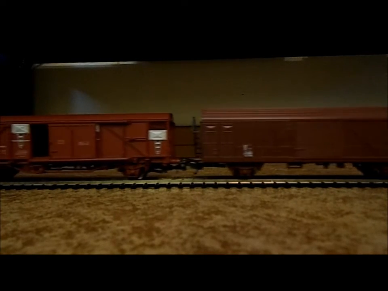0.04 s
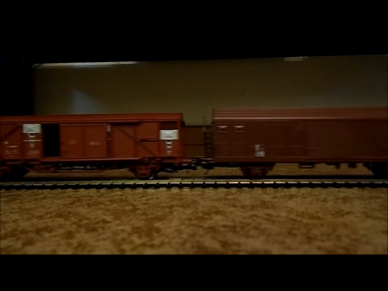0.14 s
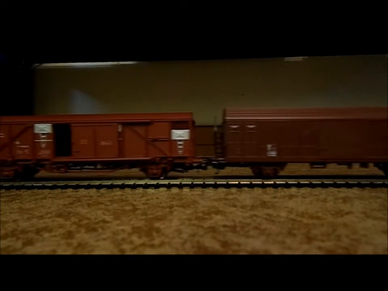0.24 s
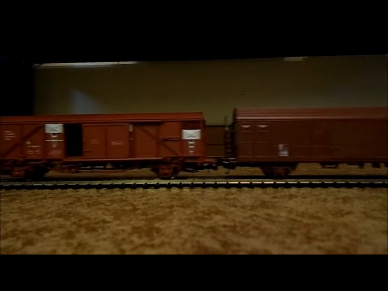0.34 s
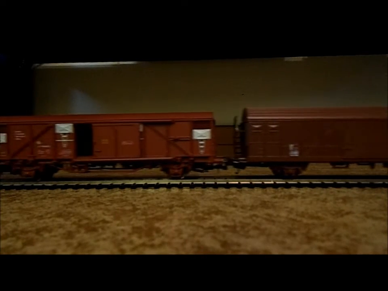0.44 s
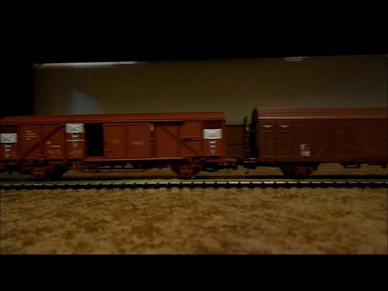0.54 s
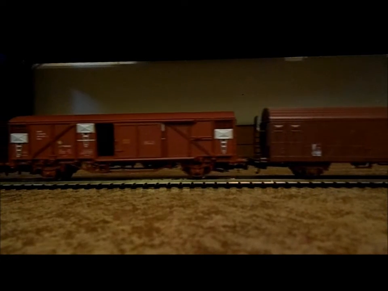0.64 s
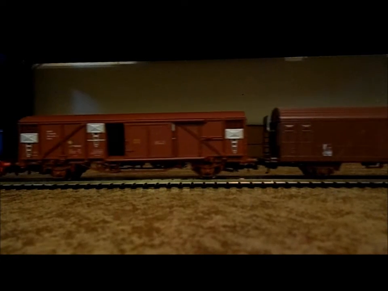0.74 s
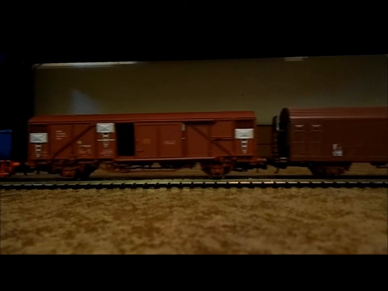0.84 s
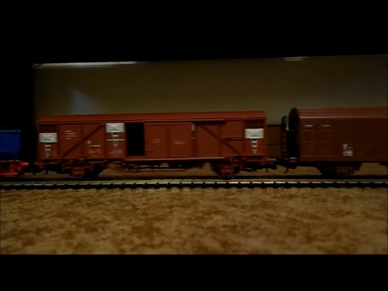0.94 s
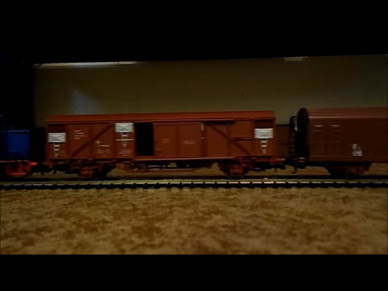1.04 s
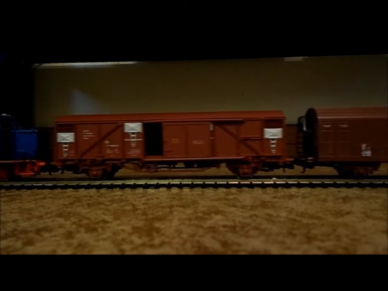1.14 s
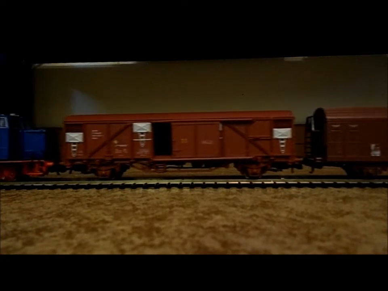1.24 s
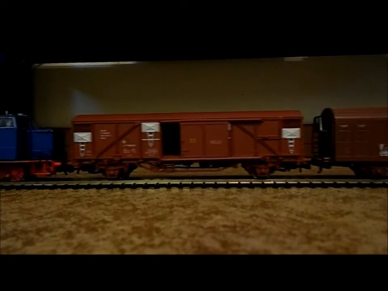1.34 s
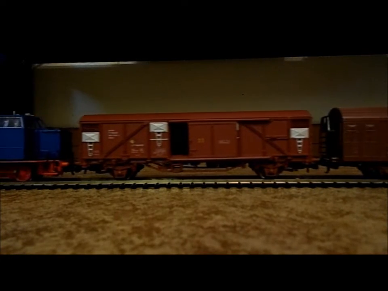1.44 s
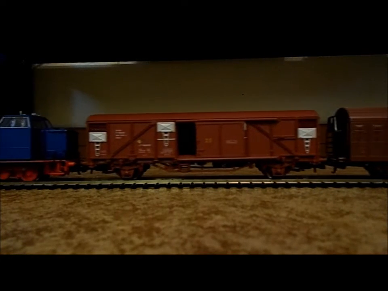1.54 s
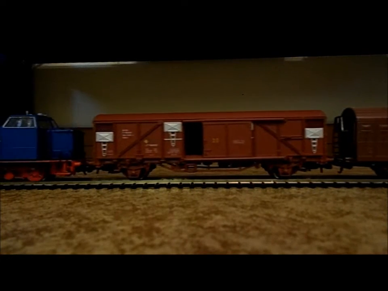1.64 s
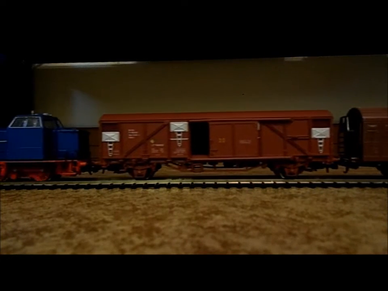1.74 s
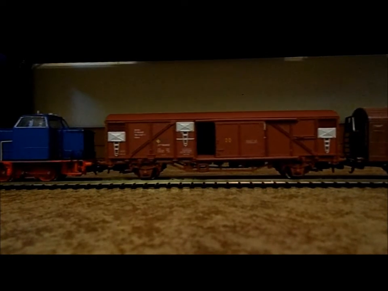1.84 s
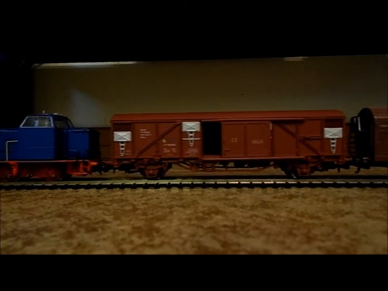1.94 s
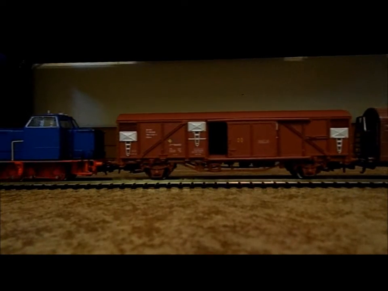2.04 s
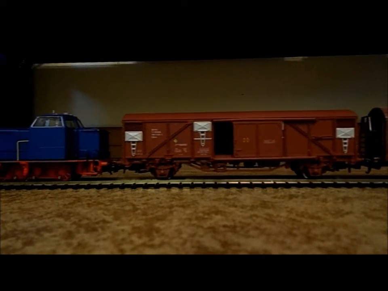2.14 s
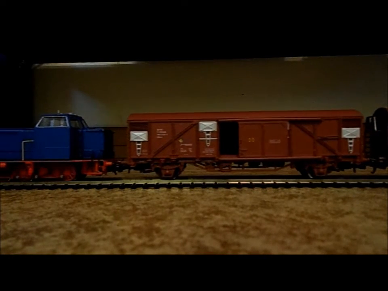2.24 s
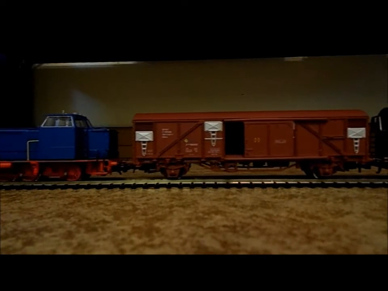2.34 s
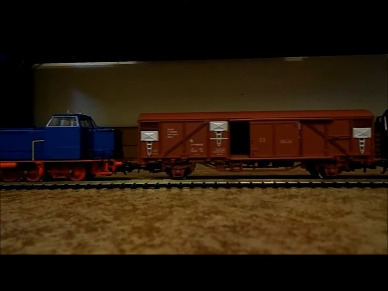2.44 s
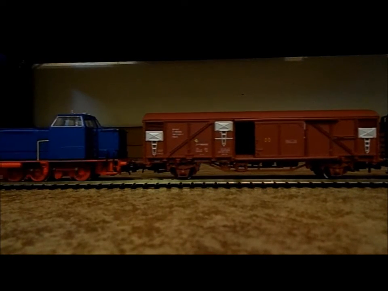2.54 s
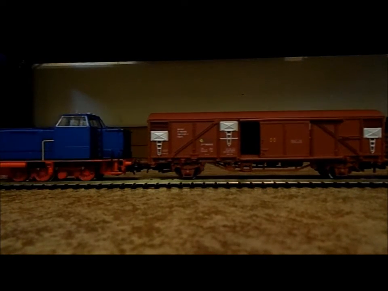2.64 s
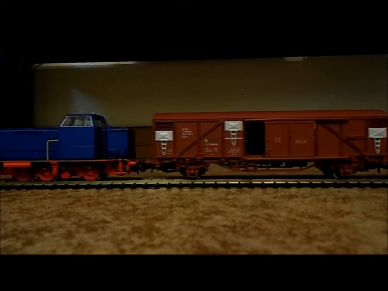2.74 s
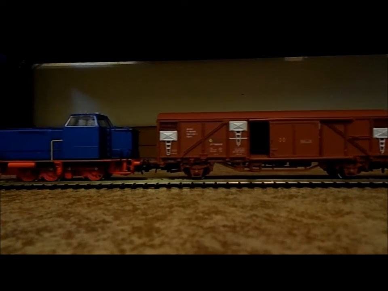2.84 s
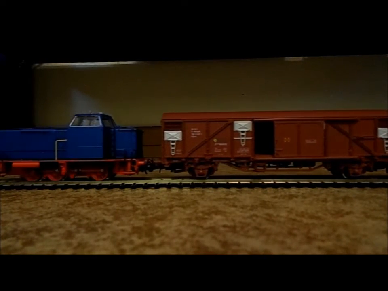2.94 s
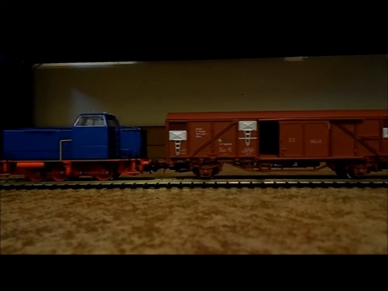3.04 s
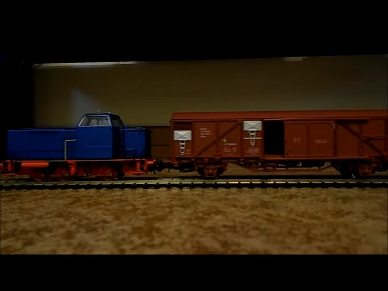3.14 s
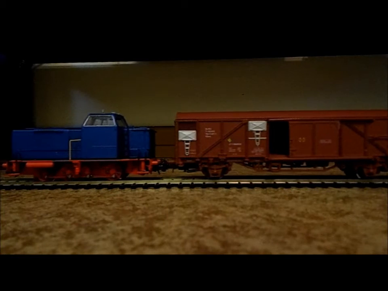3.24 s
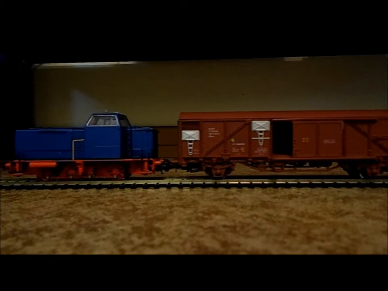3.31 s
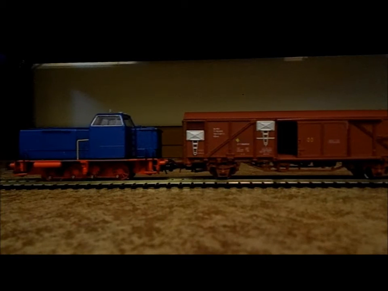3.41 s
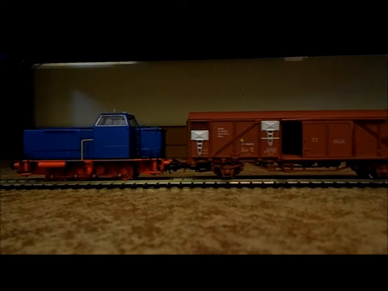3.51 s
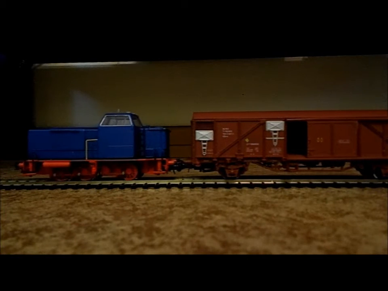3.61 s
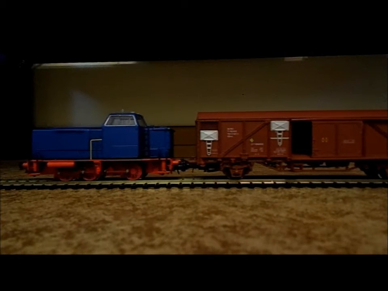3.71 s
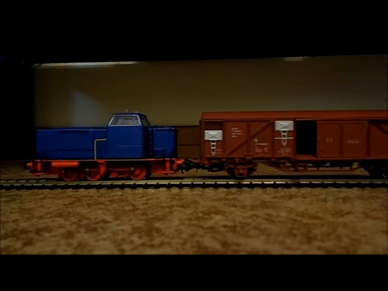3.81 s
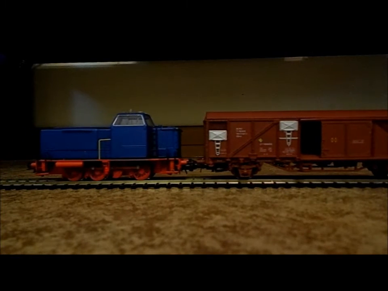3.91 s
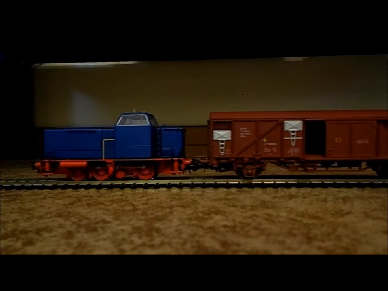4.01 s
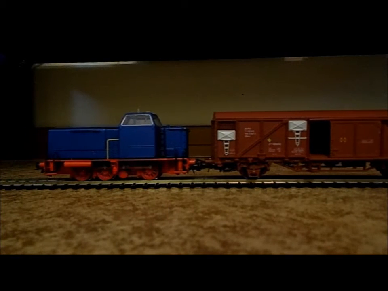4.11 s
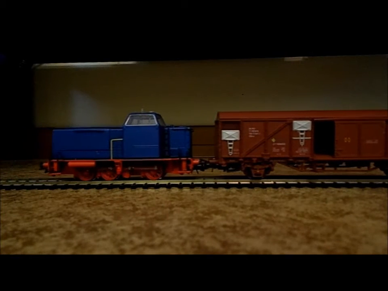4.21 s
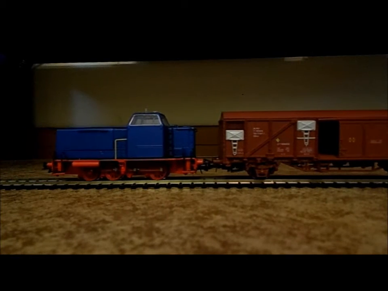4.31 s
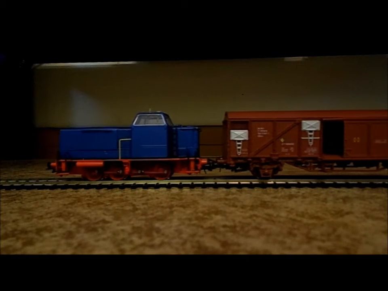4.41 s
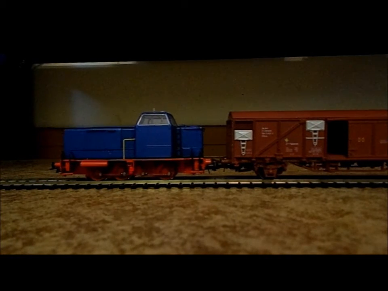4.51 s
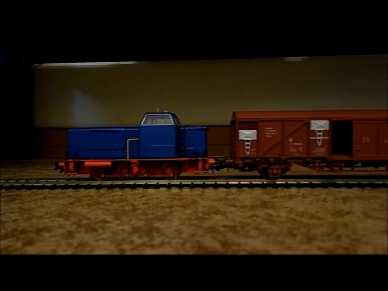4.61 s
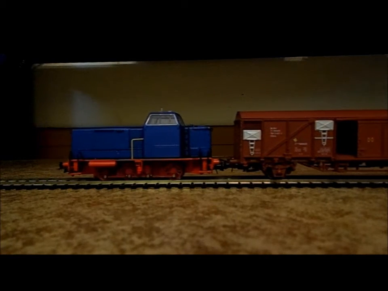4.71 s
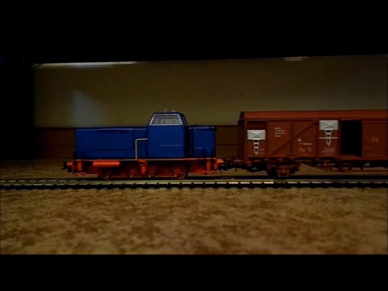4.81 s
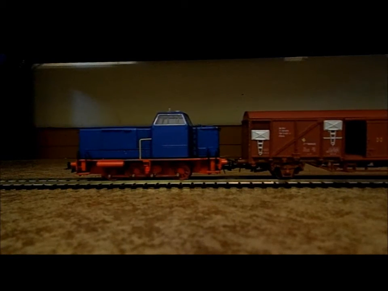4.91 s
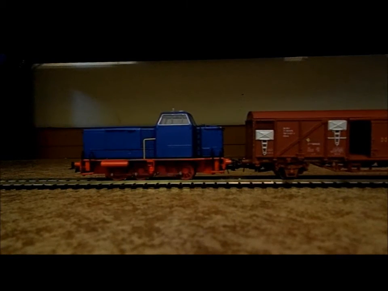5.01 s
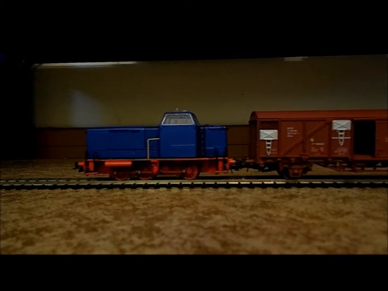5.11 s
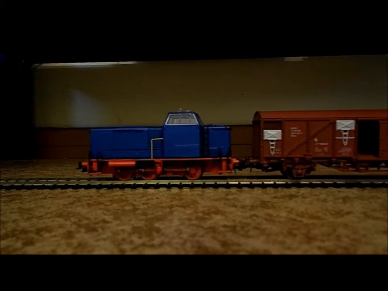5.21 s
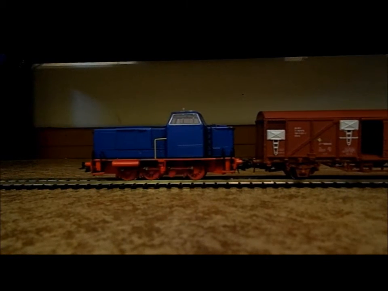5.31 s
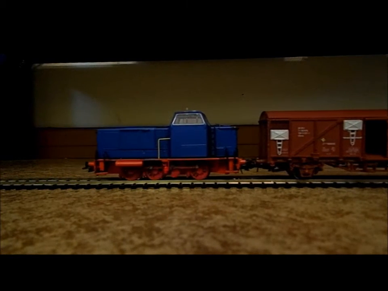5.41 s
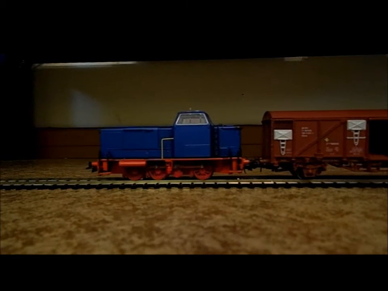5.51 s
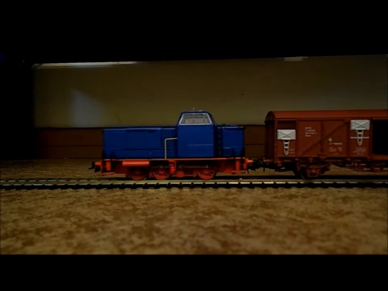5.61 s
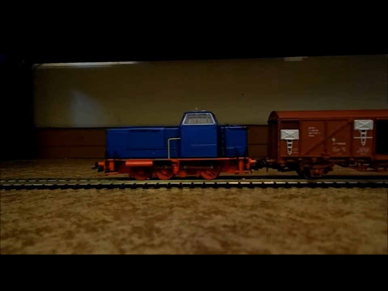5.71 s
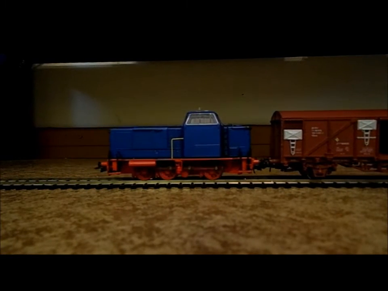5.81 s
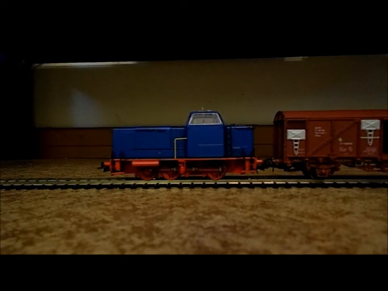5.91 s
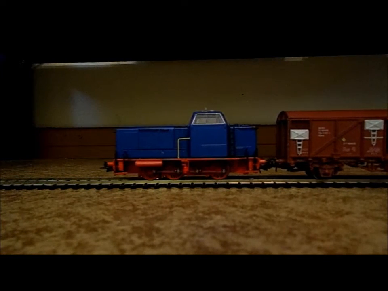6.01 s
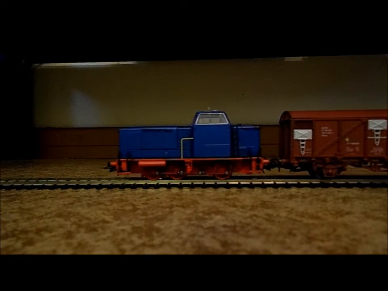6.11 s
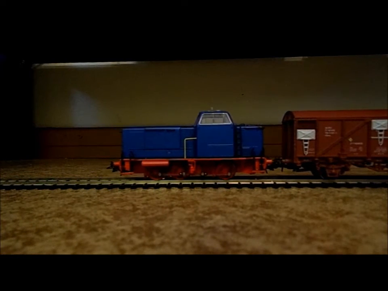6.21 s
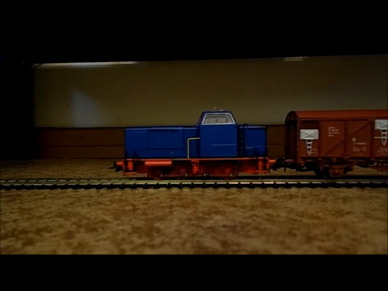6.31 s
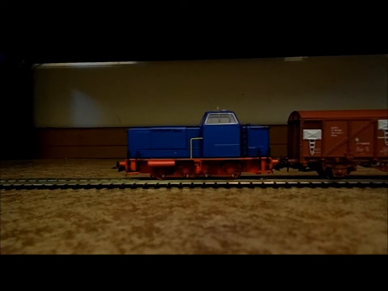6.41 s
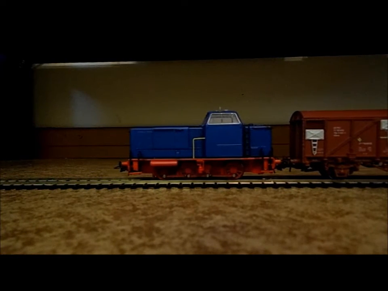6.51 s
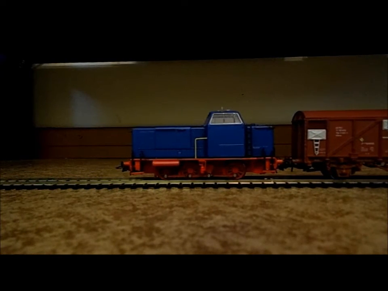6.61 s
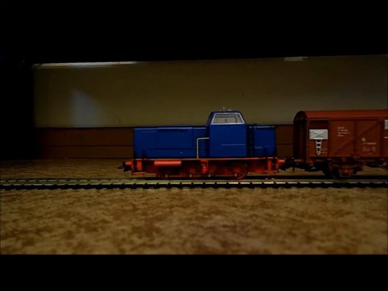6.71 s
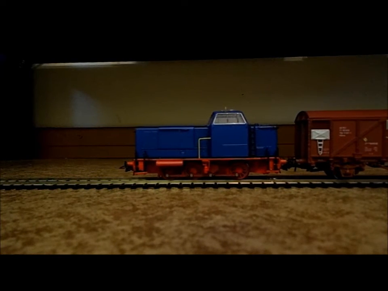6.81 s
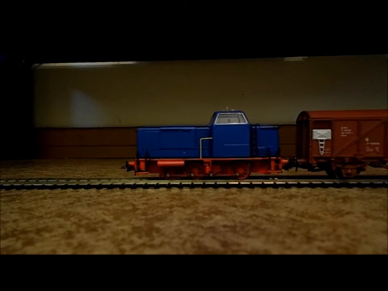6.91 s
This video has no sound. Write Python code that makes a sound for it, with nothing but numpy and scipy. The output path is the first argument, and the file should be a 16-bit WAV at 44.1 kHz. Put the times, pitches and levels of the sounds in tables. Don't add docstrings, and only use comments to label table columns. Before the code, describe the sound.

Close mono sound of a model train slowing indoors. At first dull knocks of wagon wheels bunch together over hissing wheels and fizzy, fast gear noise. Then the gears calm into a slower, separated rattle, while a nasal electric hum stays constant in pitch, with wavering tones sliding around it. Occasional clicks from the rails, faint ticking and a slow rumbling drone from outside complete the quiet room.

```python
import sys
import numpy as np
from scipy import signal
from scipy.fft import next_fast_len
from scipy.io import wavfile
from scipy.ndimage import uniform_filter1d

SR = 44100
rng = np.random.default_rng(int(sys.argv[2]) if len(sys.argv) > 2 else 0)


def elevation(decibels):
    levels = np.asarray(decibels, float)
    return 10 ** (levels / 20)


def file_out(sig):
    cols = np.atleast_2d(sig).T
    lim = np.clip(cols, -1, 1)
    pcm = np.round(lim * 32767).astype(np.int16)
    wavfile.write(sys.argv[1], SR, pcm)


N = 306495

# time in seconds, speed in turns per s.
SHAFT_SPEED = [(0.0, 84.0), (0.642, 76.99), (1.211, 66.14), (1.663, 48.79), (2.101, 40.54), (2.758, 32.92),
               (3.103, 35.31), (3.391, 32.42), (3.564, 33.19), (3.927, 30.89), (4.07, 28.72),
               (4.446, 31.49), (5.038, 28.83), (5.185, 26.35), (5.549, 24.75), (6.292, 23.17),
               (6.546, 16.6), (6.95, 11.27)]

# multiple of the chopper rate, level in dB.
ARRIVING_TONES = [(1, -7.5), (2, -24), (3, -5.5), (4, 5.5), (5, 0.5), (6, -3.5), (7, -9), (8, -14), (9, -1),
                  (10, -14), (11, -13), (12, -18), (13, -5), (14, -10), (15, -61), (16, -8), (17, -6),
                  (18, -8), (19, -11), (20, -10), (21, -11), (22, -22), (23, -23), (24, -9.5)]
ROLLING_TONES = [(1, -10.5), (2, -12.5), (3, -13.5), (4, 4), (5, -2.5), (6, -10), (7, -19.5), (8, -6),
                 (9, -3), (10, -6), (11, -2), (12, -10), (13, -11), (14, -20), (15, -40), (16, -45),
                 (17, -13.5), (18, -12.5), (19, -22), (20, -13.5), (21, -19.5), (22, -20.5), (23, -14),
                 (24, -20)]
STALLING_TONES = [(1, -13), (2, -17), (3, -15), (4, 2), (5, -10), (6, -11.5), (7, -31), (8, -18), (9, -2.5),
                  (10, -9.5), (11, -4), (12, -8), (13, -7.5), (14, -10), (15, -16), (16, -30), (17, -38),
                  (18, -33), (19, -29), (20, -28), (21, -26), (22, -24), (23, -15.5), (24, -20)]
STATE_DB = [-64.5, -61, -58]
# frequency in Hz, width in Hz, level in dB.
EDGE_MODES = [(4100, 400, -83), (4900, 300, -81), (5500, 300, -77.5), (6300, 400, -81), (7900, 300, -75),
              (8400, 600, -79), (9800, 400, -78), (11500, 400, -82), (12985, 100, -81), (14600, 400, -82),
              (15300, 700, -80)]
# frequency in Hz, gain in dB.
HOUSING_RESPONSE = [(900, -30), (1150, -9), (1300, -9), (1440, 1), (1590, 1), (1740, -8), (1900, -9),
                    (2100, -10.5), (2350, -14), (2800, -30)]
# shaft speed in turns per s, level in dB.
ROTOR_LEVEL = [(16, -66), (24, -68), (35, -67.5), (45, -70), (56, -67), (66, -66), (84, -72)]

# shaft speed in turns per s, gear train in dB, upper ring in dB, steady hiss share 0-1.
GEAR_LEVELS = [(10, -75, -82, .5), (23.9, -69, -75, 0.31), (34, -65.5, -74, 0.23), (42, -62.5, -69, 0.4),
               (49, -59.5, -62, 0.65), (69, -59, -61.5, .6), (78, -54.5, -61.5, .65), (84, -57.5, -60, .6)]
# frequency in Hz, width in Hz, level in dB.
GEAR_MODES = [(9060, 160, -6), (9150, 930, 0), (9720, 590, -2), (10300, 390, -3)]
# frequency in Hz, width in Hz, level in dB.
UPPER_MODES = [(11500, 400, -5), (12250, 650, -1), (13400, 900, -9), (14400, 500, -7)]

# frequency in Hz, density in dB per Hz.
ROLLING_SPECTRUM = [(100, 6.5), (300, 5), (500, 4), (900, 8), (1300, 1), (2100, 0.5), (3000, -5.5),
                    (5000, -5.5), (7000, -5.5), (11000, -2.5), (15500, -37)]
# start in seconds, peak in dB, frequency in Hz, low knock in dB.
RAIL_JOINTS = [
    (.3005, -47.5, 6200, -6),
    (1.128, -54, 2800, -6),
    (3.298, -45, 2600, 4),
    (5.062, -51, 5100, -4),
    (5.066, -53, 3300, -6),
    (5.883, -56, 3600, -6),
]

# time in seconds, frequency in Hz, level in dB.
DRONE_GLIDE = [(0, 31.15, -60), (.08, 32.19, -34.5), (.22, 31.42, -36.7), (.54, 33.45, -24.4),
               (.79, 30.86, -34.5), (1.02, 34.07, -20.2), (1.62, 37.57, -34.9), (2.1, 37.32, -28.7),
               (2.92, 38.36, -31.3), (3.62, 42.35, -42.5), (4.13, 40.42, -39.8), (4.54, 37.95, -28.6),
               (4.88, 42.08, -42.9), (5.26, 41.37, -39.5), (5.93, 39.31, -41.1), (6.55, 37.43, -34.4),
               (6.71, 35.2, -26), (6.95, 37.5, -29.5)]
# frequency in Hz, level in dB.
WALL_OCTAVE = [(62, -57.5), (66, -50), (72, -80), (79, -64.5), (84, -75)]
# frequency in Hz, level in dB.
STEADY_HUMS = [(30.588, -57.5), (34.013, -51.0), (36.708, -51.5)]

# frequency in Hz, density in dB per Hz.
ROOM_SPECTRUM = [(40, -19.5), (60, 4.5), (100, -5.5), (200, -12.5), (500, -16), (1000, -20), (1500, -15),
                 (2200, -22.5), (3000, -25), (4400, -27), (7000, -26.5), (9000, -27.5), (13000, -28.5),
                 (15700, -29)]
# frequency in Hz, width in Hz, level in dB, steady part against the fuzz.
HOUSEHOLD_TONES = [(32.7, 3.7, -53, 0.016), (61, 1.3, -68.5, 0), (152.9, 20, -75.5, 0.025),
                   (300.2, 10.8, -67.5, 0.063)]

# start in seconds, peak in dB, frequency in Hz.
WHEEL_KNOCKS = [(0.041, -42, 797), (0.109, -47, 624), (0.289, -40, 636), (0.359, -33.5, 490),
                (0.409, -37, 634), (0.434, -40, 630), (0.514, -31.5, 557), (0.684, -46, 641),
                (0.958, -54, 636), (1.169, -51, 487), (1.769, -53, 622)]
# start in seconds, peak in dB, frequency in Hz.
CLOCK_TICKS = [(0.1256, -42, 2080), (0.9602, -46, 1990), (1.9545, -54, 2045), (2.9545, -52, 2060),
               (3.9376, -47, 1840), (4.9491, -45, 2026), (5.9352, -43, 1940)]

TIME = np.arange(N) / SR


def evened(x):
    return x / np.sqrt(np.mean(x ** 2) + 1e-20)


def follow(rows, along=None):
    position, *columns = np.transpose(rows)
    along = TIME if along is None else along
    return [np.interp(along, position, column) for column in columns]


def colour(x, points):
    f, db = np.transpose(points)
    hz = abs(np.fft.fftfreq(8192, 1 / SR))
    log_gain = np.log(elevation(np.interp(np.log(hz + 1), np.log(f + 1), db)))
    response = np.exp(np.conj(signal.hilbert(log_gain)))
    taps = np.fft.ifft(response).real[:4096]
    return signal.oaconvolve(x, taps)[:len(x)]


def resonate(x, hz, width):
    r = np.exp(-np.pi * width / SR)
    pole = r * np.exp(2j * np.pi * hz / SR)
    return 2 * signal.lfilter([1 - r], [1, -pole], x).real


def ring(x, modes):
    return sum(elevation(db) * resonate(resonate(x, hz, width), hz, width) for hz, width, db in modes)


def patchy(x, patchy_db, frames, bins):
    spectrum = signal.stft(x, nperseg=1024, noverlap=768)[2]
    field = rng.standard_normal(spectrum.shape)
    for _ in range(2):
        field = uniform_filter1d(field, max(int(bins), 1), 0)
        field = uniform_filter1d(field, max(int(frames), 1), 1)
    return signal.istft(spectrum * elevation(patchy_db * evened(field)), nperseg=1024, noverlap=768)[1][:N]


def smear(x, hz, width):
    r = np.exp(-np.pi * width / SR)
    poles = [1, -2 * r * np.cos(2 * np.pi * hz / SR), r * r]
    return signal.lfilter(poles[::-1], poles, x)


def chopper_pulses(chop_hz):
    first_pulse = 184
    half_phase = np.pi * chop_hz * (np.arange(N) + .5 - first_pulse) / SR
    return (np.sin(199 * half_phase) / np.sin(half_phase) - 1) / np.sqrt(2)


def rotor_tones(pulses, turns, speed):
    poles, housing_lag = 5, 27
    mirror_from, mirror_full = 52, 38
    slots = np.exp(2j * np.pi * poles * turns)
    mirror = .55 * np.clip((mirror_from - speed) / (mirror_from - mirror_full), 0, 1)
    shift = np.exp(2.7j) * (slots + mirror / slots)
    analytic = signal.hilbert(pulses, next_fast_len(N))[:N]
    shifted = (np.roll(analytic, housing_lag) * shift).real
    return elevation(follow(ROTOR_LEVEL, speed)[0]) * colour(shifted, HOUSING_RESPONSE)


def whine(turns, speed):
    chop_hz = 158.346
    free_turns, loaded_turns = 79, 55
    stall_s, stall_len_s = 6.3, .08
    pulses = chopper_pulses(chop_hz)
    arriving = np.clip((speed - loaded_turns) / (free_turns - loaded_turns), 0, 1) ** 1.3
    stalling = np.clip((TIME - stall_s) / stall_len_s, 0, 1)
    shares = [arriving, 1 - arriving - stalling, stalling]
    states = [ARRIVING_TONES, ROLLING_TONES, STALLING_TONES]
    out = rotor_tones(pulses, turns, speed)
    for share, orders, state_db in zip(shares, states, STATE_DB):
        tones = [(k * chop_hz, level + state_db) for k, level in orders]
        out = out + share * colour(pulses, [(60, -100)] + tones + [(4300, -100)])
    high = colour(out, [(2450, -30), (2650, 0)])
    out = out - high + patchy(high + ring(pulses, EDGE_MODES), 2.6, 70, 5)
    return smear(smear(out, 585, 100), 1279, 73)


def gears(turns, speed):
    gear_db, upper_db, hiss = follow(GEAR_LEVELS, speed)
    hiss = np.clip(hiss, 0, 1)
    angle = turns + .205
    blows = elevation(2.0 * rng.standard_normal(700))
    out = 0
    trains = [(1, GEAR_MODES, gear_db, 0.048), (2, UPPER_MODES, upper_db, 0.05)]
    for per_turn, modes, db, rise in trains:
        count = (angle * per_turn).astype(int)
        strength = blows[count // per_turn] * np.where(count % per_turn, .55, 1)
        since = (angle * per_turn % 1) / (per_turn * rise)
        rattle = strength * since * np.exp(1 - since)
        drive = (hiss + (1 - hiss) * 1.4 * rattle) * rng.standard_normal(N)
        sound = ring(drive, modes)
        sound /= np.sqrt(uniform_filter1d(sound ** 2, SR // 4))
        out = out + elevation(db) * patchy(sound, 0.58, 27, 6.3)
    return out


def wheels():
    start_db, fade_db_per_s = -52.5, 4
    unevenness = evened(uniform_filter1d(rng.standard_normal(N), 150))
    grit = rng.standard_normal(N) * elevation(1.5 * unevenness)
    hiss = patchy(evened(colour(grit, ROLLING_SPECTRUM)), 1.9, 8.2, 8)
    out = elevation(start_db - fade_db_per_s * TIME) * hiss
    t = np.arange(1500) / SR
    for s, db, hz, low_db in RAIL_JOINTS:
        burst = rng.standard_normal(1500) * np.exp(-t / 0.011) * np.minimum(t / 0.0012, 1)
        click = ring(burst, [(hz, 3000, 6)])
        low_knock = 2 * elevation(low_db) * resonate(burst, 650, 600)
        out[round(s * SR):][:1500] += evened(click + low_knock) * elevation(db - 11.5)
    return out


def drone():
    hz, db = follow(DRONE_GLIDE)
    phase = 2 * np.pi * np.cumsum(hz) / SR
    swell = uniform_filter1d(elevation(db), 1323)
    octave = uniform_filter1d(elevation(follow(WALL_OCTAVE, 2 * hz)[0]), 8000)
    hums = sum(elevation(level) * np.sin(2 * np.pi * f * TIME) for f, level in STEADY_HUMS)
    return np.sqrt(2) * (swell * np.sin(phase) + octave * np.sin(2 * phase) + hums)


def room():
    out = elevation(-54.5) * patchy(evened(colour(rng.standard_normal(N), ROOM_SPECTRUM)), 0.81, 11, 12)
    for hz, width, db, steady in HOUSEHOLD_TONES:
        drive = rng.standard_normal(N) + steady * np.sin(2 * np.pi * hz * TIME)
        out += elevation(db) * evened(ring(drive, [(hz, width, 0)]))
    return out


def electronics():
    return elevation(-75) * np.sqrt(2) * np.sin(2 * np.pi * 12931.5 * TIME)


def bumps():
    out, t = np.zeros(N), np.arange(2500) / SR
    for s, db, hz in WHEEL_KNOCKS:
        blow = rng.standard_normal(2500) * np.exp(-t / 0.012)
        knock = resonate(blow, hz, 140)
        out[round(s * SR):][:2500] += elevation(db - 10.0) * knock / abs(knock).max()
    return out


def clock():
    out, t = np.zeros(N), np.arange(3500) / SR
    for s, db, hz in CLOCK_TICKS:
        blow = rng.standard_normal(3500) * np.exp(-t / 0.025)
        tick = resonate(blow, hz, 110)
        out[round(s * SR):][:3500] += elevation(db - 5) * tick / abs(tick).max()
    return out


def scene():
    speed = follow(SHAFT_SPEED)[0]
    turns = np.cumsum(speed) / SR
    locomotive = whine(turns, speed) + gears(turns, speed) + electronics()
    wagons = wheels() + bumps()
    house = drone() + room() + clock()
    return (locomotive + wagons + house)[None]


def top_cut(x):
    return signal.sosfilt(signal.butter(12, 16310, fs=SR, output="sos"), x)


def record(dry):
    low_pass = signal.firwin(801, 15740, window=("kaiser", 9), fs=SR)
    mix = signal.oaconvolve(dry, low_pass[None], "same")
    return top_cut(mix)


dry = scene()
out = record(dry)
file_out(out)
```